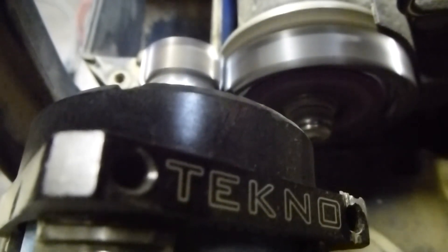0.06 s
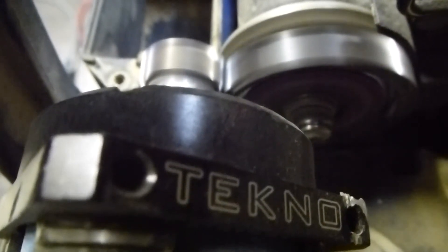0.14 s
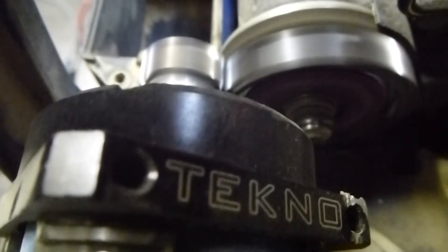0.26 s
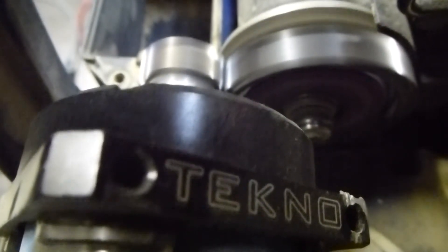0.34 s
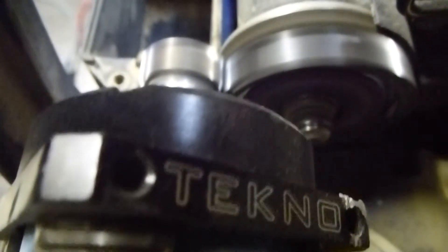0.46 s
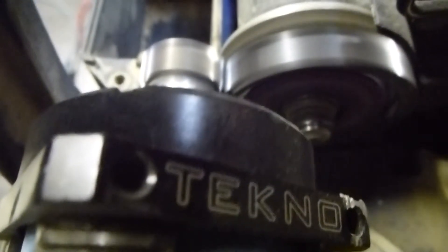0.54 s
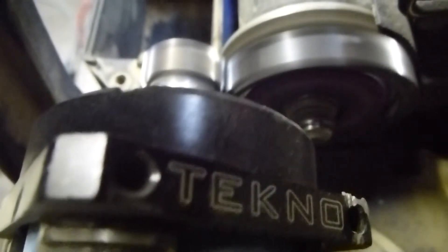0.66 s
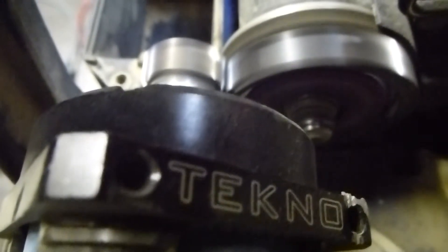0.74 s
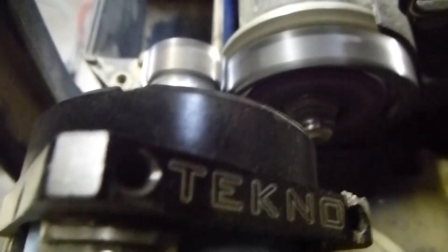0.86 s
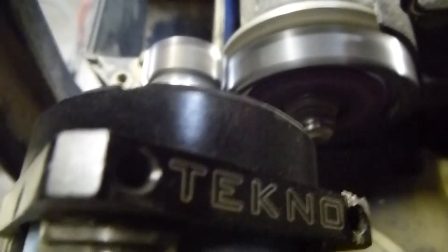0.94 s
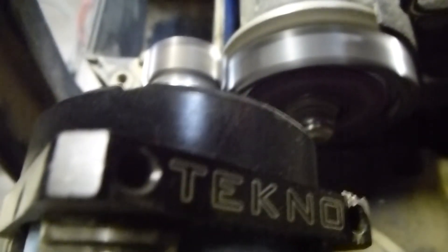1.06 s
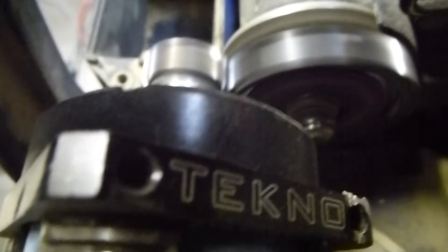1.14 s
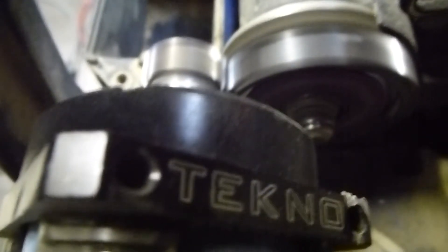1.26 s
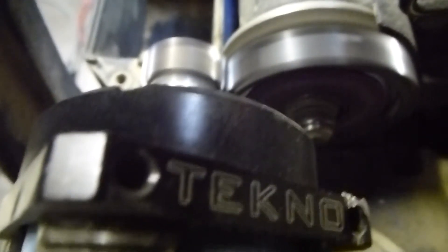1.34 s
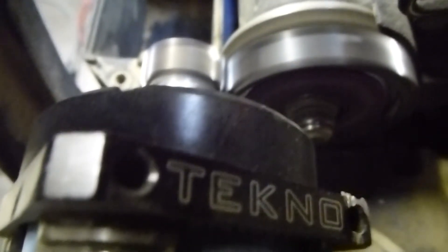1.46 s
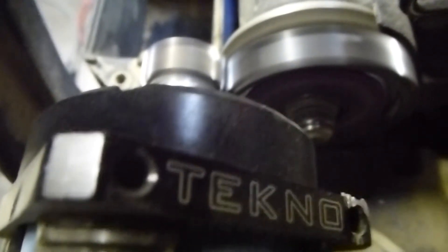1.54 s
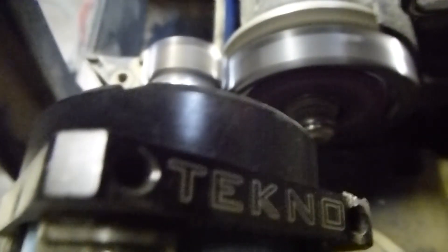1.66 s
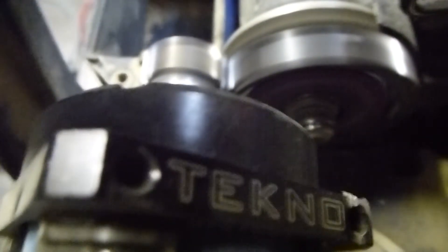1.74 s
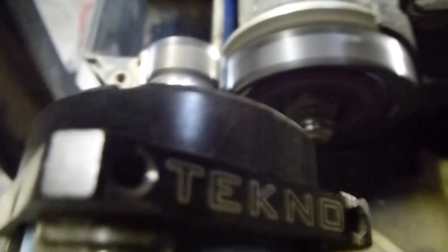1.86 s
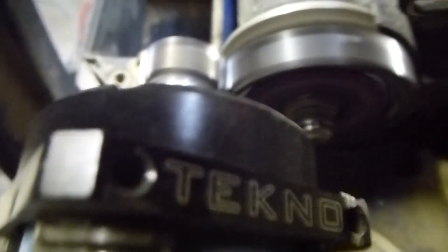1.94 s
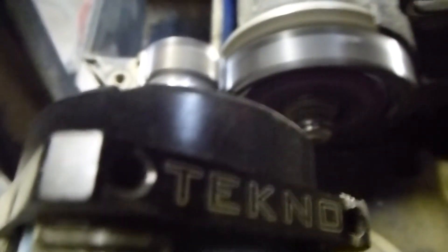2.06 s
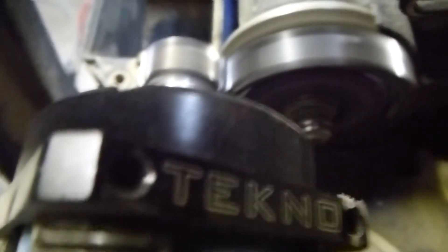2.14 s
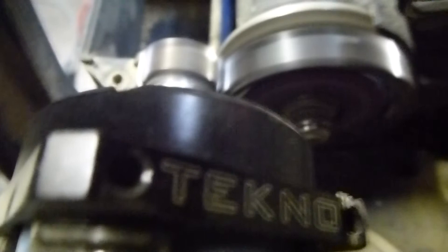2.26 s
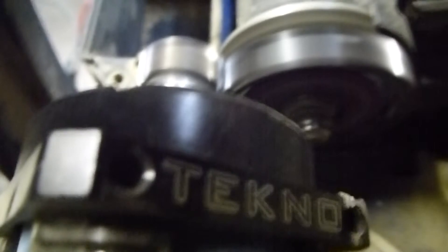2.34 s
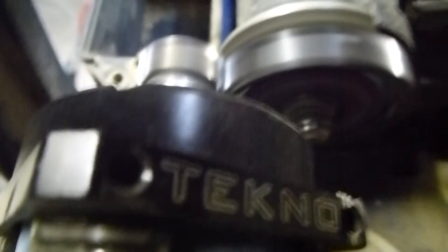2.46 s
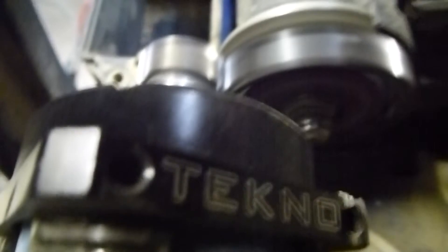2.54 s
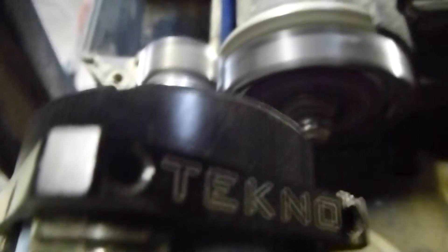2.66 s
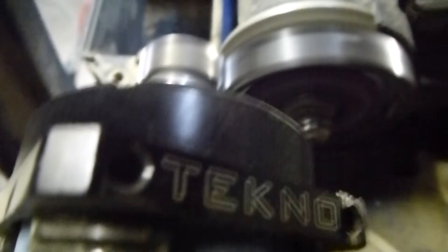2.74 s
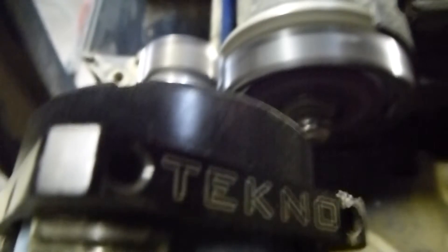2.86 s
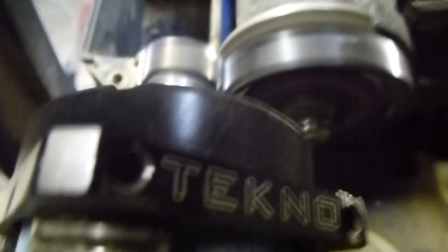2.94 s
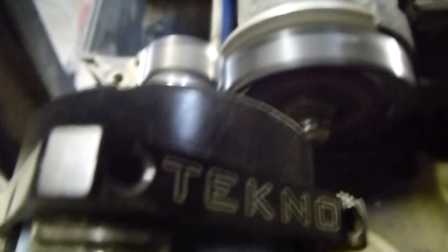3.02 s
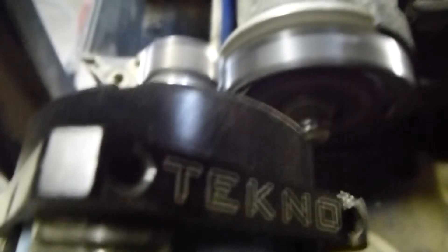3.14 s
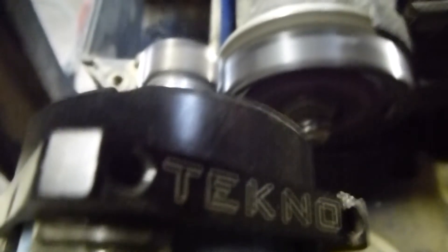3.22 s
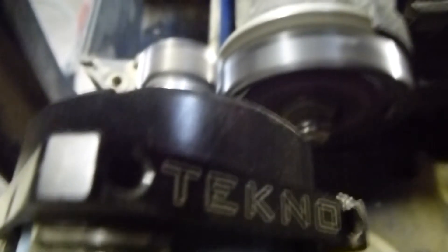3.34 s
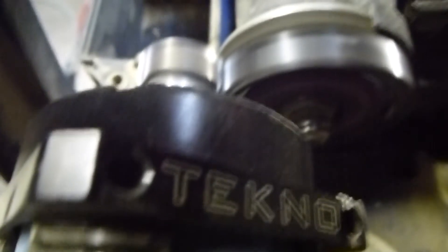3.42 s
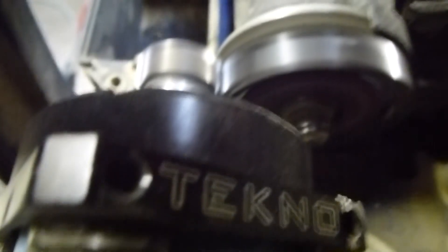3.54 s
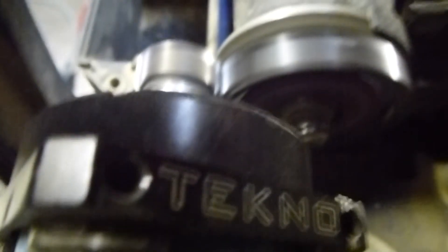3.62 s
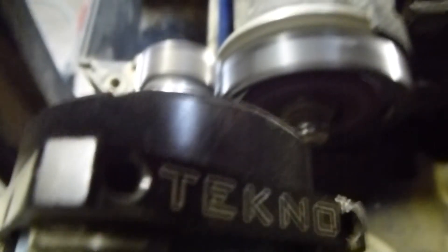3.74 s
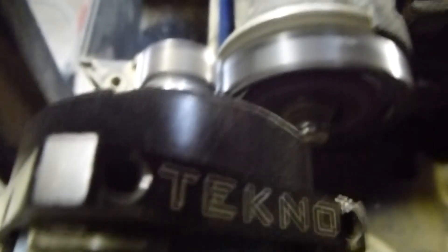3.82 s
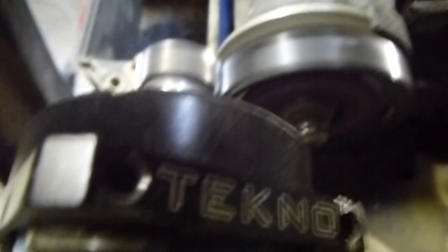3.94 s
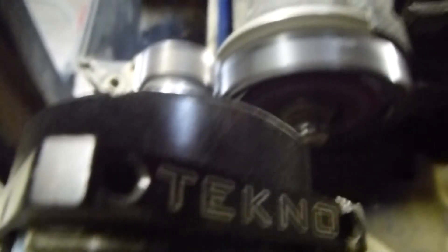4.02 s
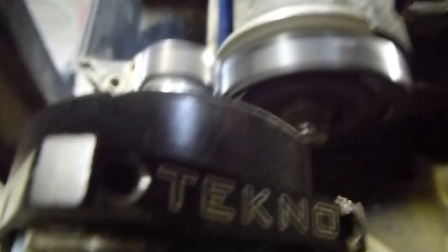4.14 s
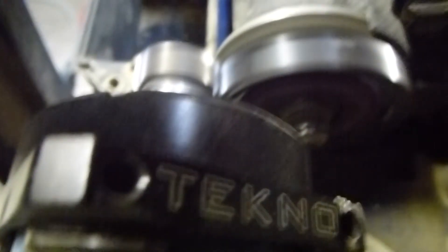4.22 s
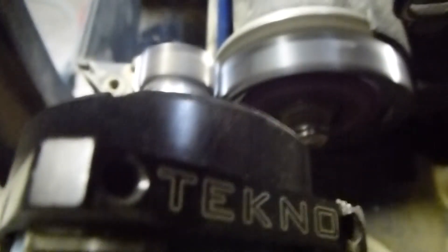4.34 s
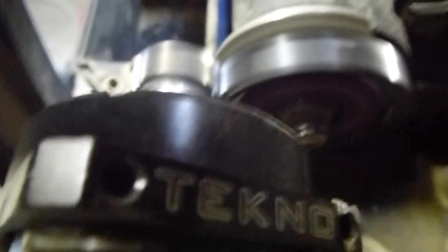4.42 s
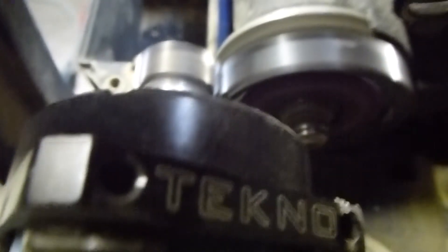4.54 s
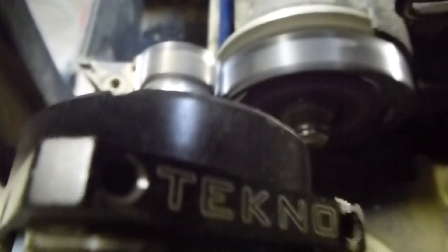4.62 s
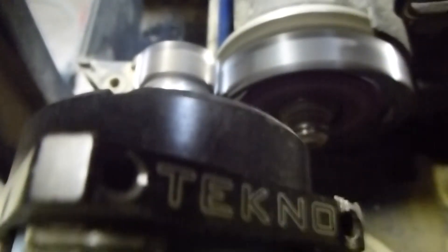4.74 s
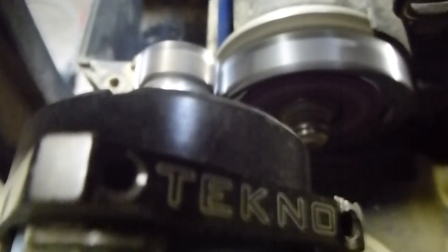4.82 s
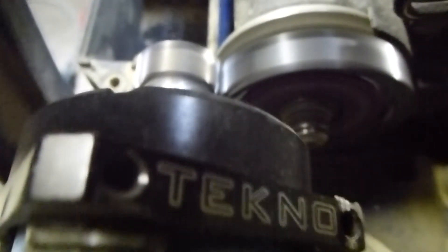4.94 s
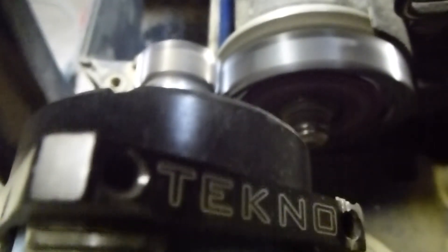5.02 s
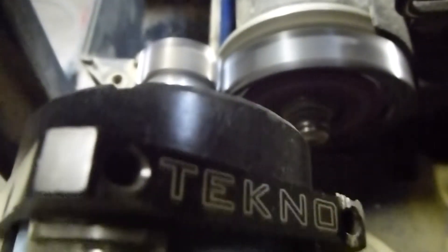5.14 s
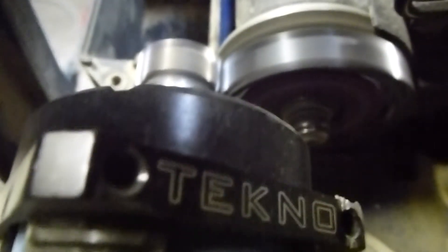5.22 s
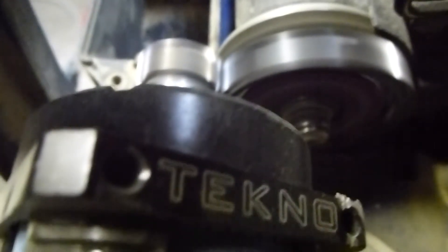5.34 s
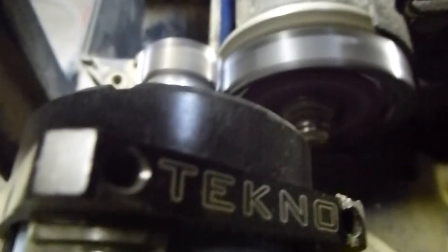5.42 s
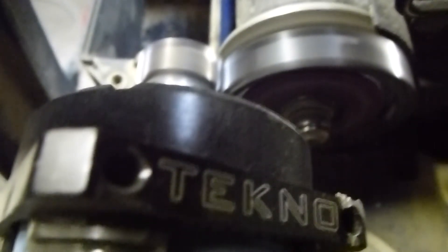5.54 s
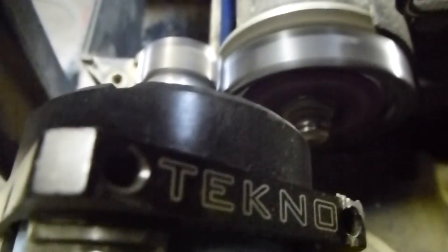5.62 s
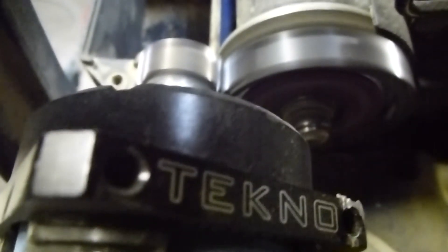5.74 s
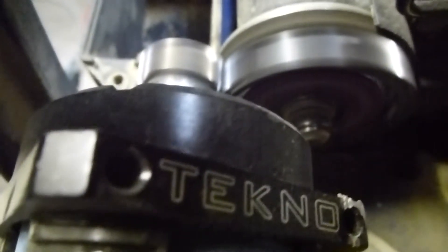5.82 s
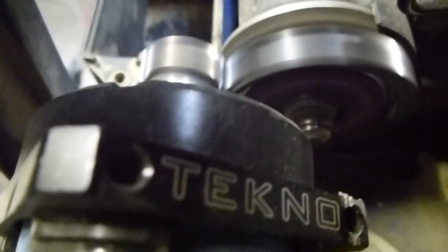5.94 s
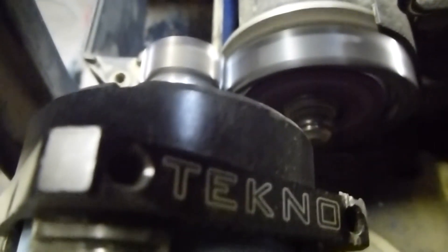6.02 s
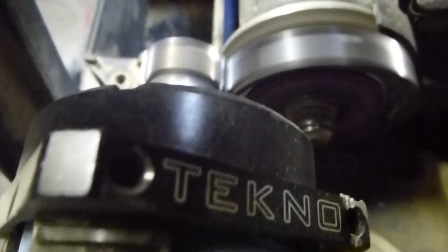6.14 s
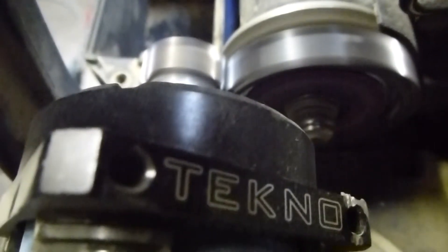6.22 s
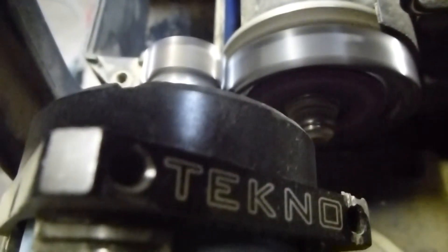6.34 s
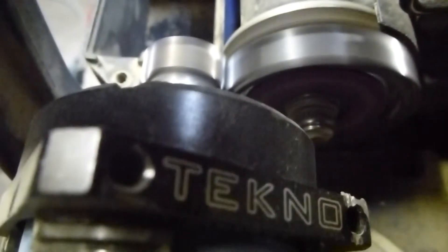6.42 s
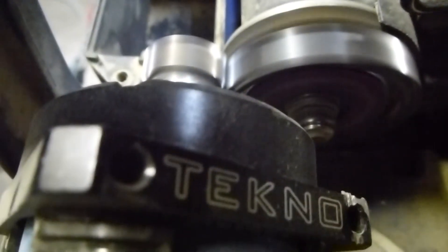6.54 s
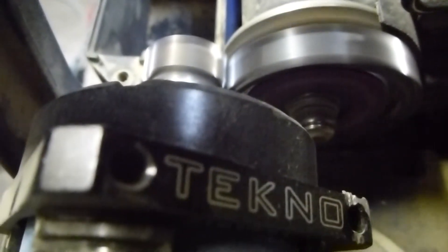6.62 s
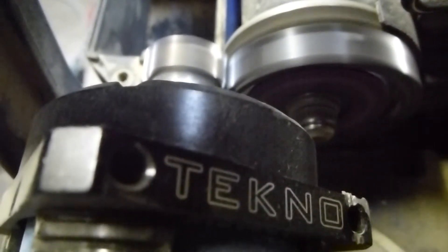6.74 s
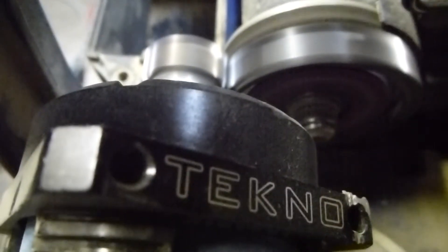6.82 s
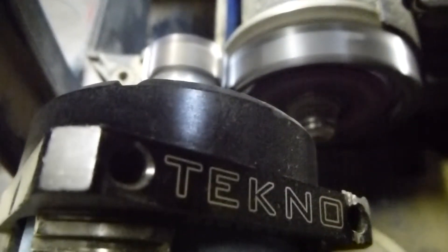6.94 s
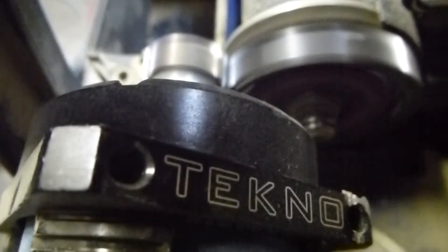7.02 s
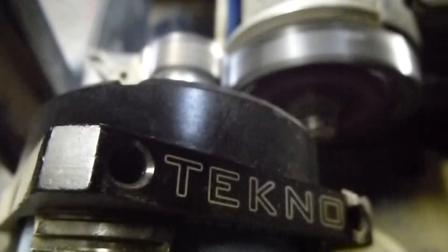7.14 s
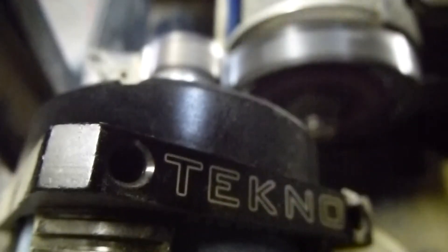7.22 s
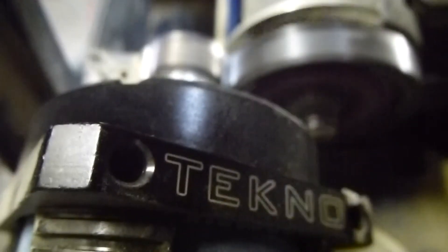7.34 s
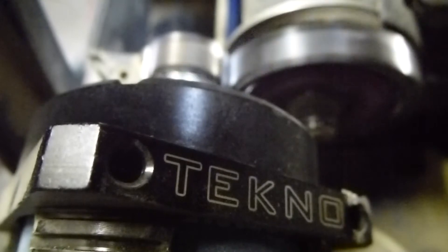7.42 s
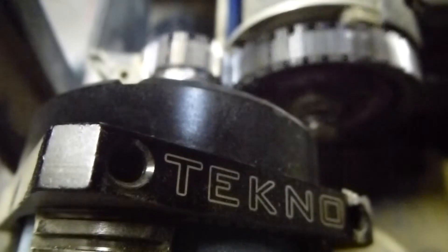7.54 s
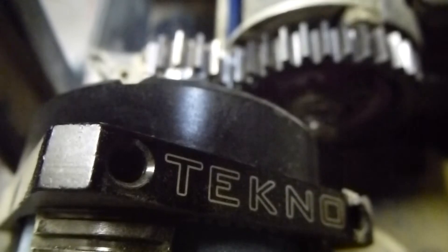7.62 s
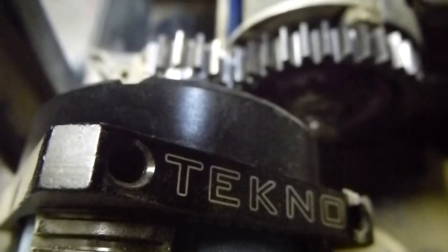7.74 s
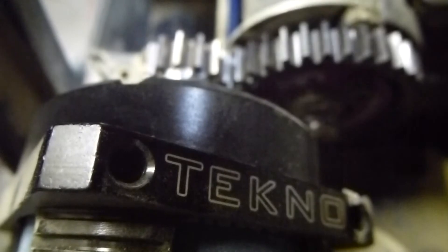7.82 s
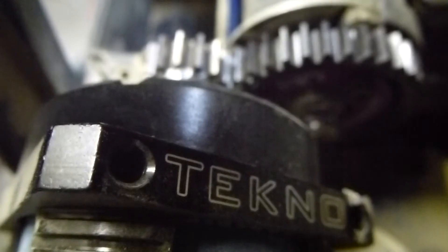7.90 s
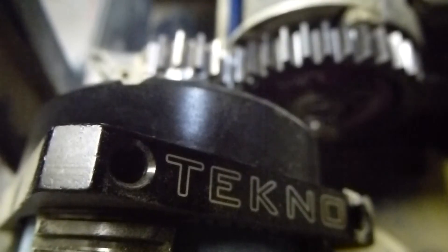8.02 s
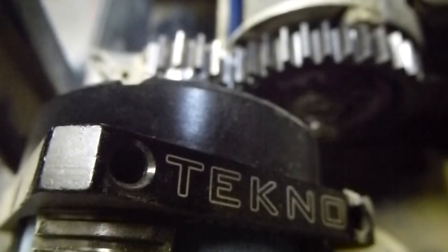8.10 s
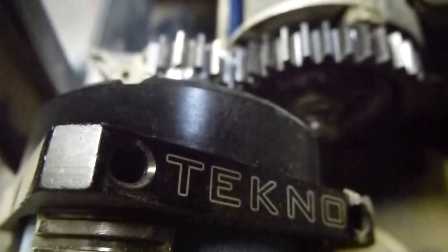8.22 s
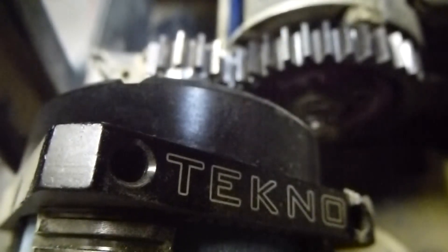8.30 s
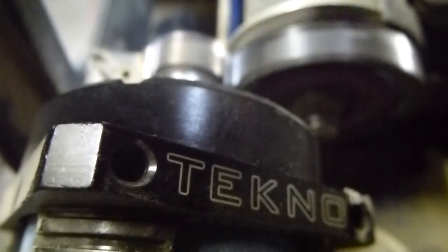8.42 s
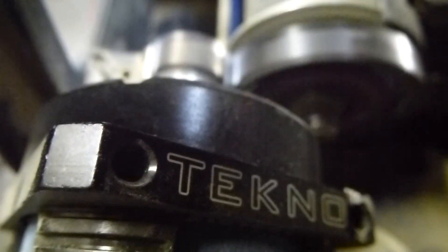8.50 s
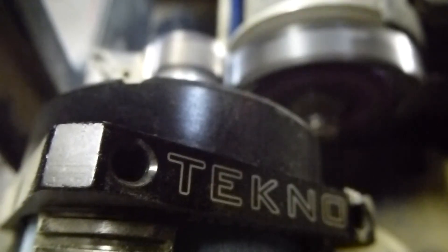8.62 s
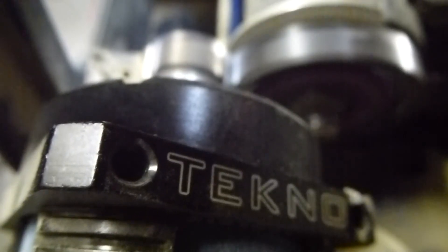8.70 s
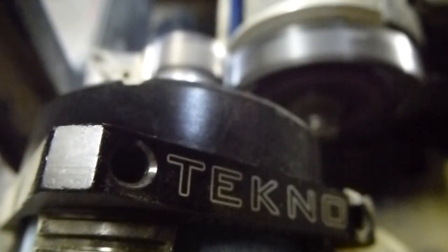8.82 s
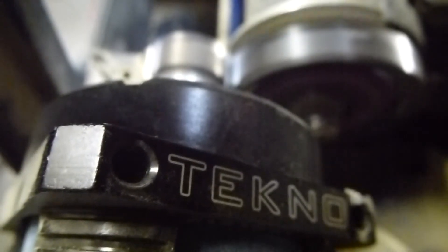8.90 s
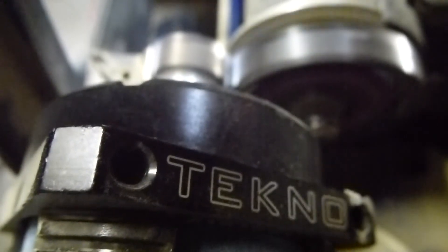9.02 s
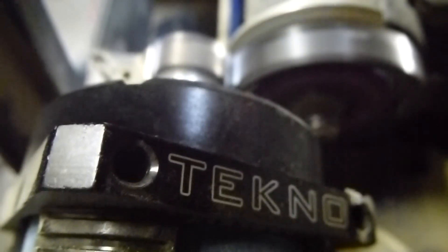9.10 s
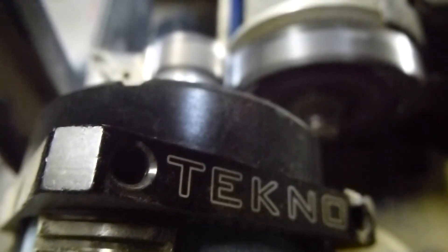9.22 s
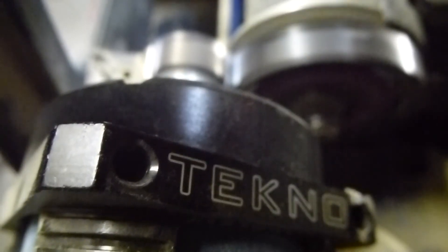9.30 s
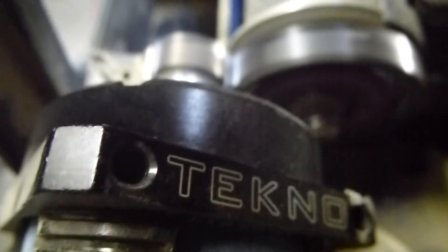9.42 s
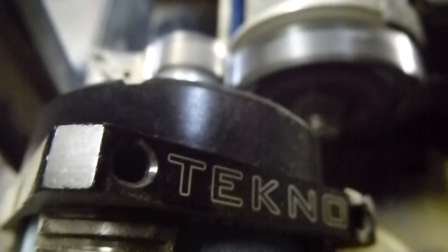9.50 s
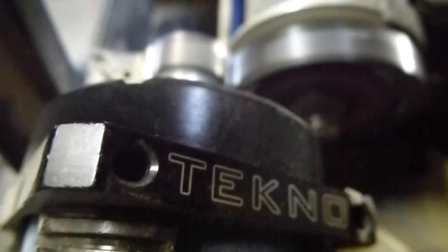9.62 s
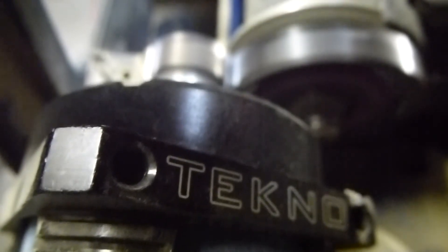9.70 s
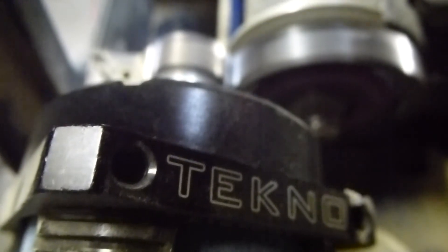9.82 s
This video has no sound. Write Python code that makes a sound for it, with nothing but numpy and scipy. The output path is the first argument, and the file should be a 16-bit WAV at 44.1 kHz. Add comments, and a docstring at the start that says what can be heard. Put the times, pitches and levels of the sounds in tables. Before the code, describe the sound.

A small electric motor with metal gears revs up to a harsh rattling whine, coasts down, clatters to a stop, then restarts.

```python
"""A small electric motor on a stand turns a 14-tooth pinion, a 38-tooth spur gear and a drive line.
It runs up, coasts to a halt and starts again: loose teeth rattle frame, case and steel gears as shaped
noise, and shafts and tooth mesh sound as sines locked to the speed. The gear sound dips near 1.9 and 5 s.
Slack teeth knock with ringing bursts, with two rasps, a dull knock and a buzz. A fan hums and hisses
throughout, heard alone at rest, where this background slowly changes in level."""
import sys
import numpy as np
from scipy.fft import rfft, irfft, next_fast_len
from scipy.io import wavfile
from scipy.ndimage import map_coordinates

SR = 44100
rng = np.random.default_rng(int(sys.argv[2]) if len(sys.argv) > 2 else 0)


def persist_wave(psi):
    """Save psi, clipped to +-1, as 16-bit WAV."""
    counts = np.round(np.clip(psi, -1, 1) * 32767).astype(np.int16)
    wavfile.write(sys.argv[1], SR, np.atleast_2d(counts).T)


N = 434817

PINION_TEETH, SPUR_TEETH = 14, 38
THROTTLE_CLOSE_S, THROTTLE_REOPEN_S, UNLOAD_S = 4.257, 8.345, 0.18
# coasting speed decays towards a point below zero (drag plus dry friction); friction eases at the end
DRAG_PER_S, FRICTION_HZ, EASE_HZ = .371, 241, 24
# changes once the load is off the teeth
COAST_FRAME_DB, COAST_HISS_DB, COAST_ROTOR_DB, COAST_SPUR_DB = 3, 0, 2, 4.5
COAST_ORDER_DB, COAST_SIDE_DB = 4, -6  # multiples 3 and 4 of motor speed; the others above 2
RING_HZ, RING_WIDTH_HZ, RING_DAMPED = 10750, 450, .42  # gear ring; share lost at its peak under load
BRIGHT_HZ, BRIGHT_WIDTH_HZ, BRIGHT_FLICKER_DB = 8500, 780, 1.5
SLOW_THROB_DB = 0.8  # hiss throb once a motor turn, at low speed
CRACK_T60_S = 0.013
BUMP_S, BUMP_DB, BUMP_HZ, BUMP_T60_S = .54, -20, 105, .05
BUZZ_HZ, BUZZ_DB, BUZZ_START_S, BUZZ_END_S = 385, -36, 8.62, 8.86
TOP_HZ = 15750

# Motor under open throttle: (time [s], speed [turns/s])
FIRST_RUN_SPEED = [(0, 149), (.3, 184), (.6, 213), (.75, 238), (1.35, 317), (1.65, 375), (1.8, 400),
                   (2.4, 485), (2.6, 508), (2.95, 525), (3.5, 525.5), (3.95, 550), (4.2, 556)]
SECOND_RUN_SPEED = [(8.345, 14), (8.39, 17), (8.402, 29), (8.425, 39), (8.445, 30), (8.46, 16), (8.475, 20),
                    (8.5, 36), (8.54, 40.5), (8.57, 48.5), (8.6, 51), (8.64, 57.5), (8.68, 61.5),
                    (8.74, 64), (8.84, 68), (8.875, 75), (8.925, 70.5), (8.95, 75), (8.97, 79.6),
                    (9.02, 80.5), (9.065, 86.8), (9.11, 87), (9.16, 92.5), (9.21, 93.5), (9.26, 97.5),
                    (9.3, 98.2), (9.335, 101.5), (9.4, 104), (9.53, 109), (9.67, 112.5), (9.86, 116.8)]
# Overall level of the gear sound as heard, with dips near 1.9 and 5 s: (time [s], level [dB])
GEAR_SOUND_LEVEL = [(0, -25), (1.3, -25.5), (1.62, -30), (1.82, -36.5), (2.05, -35.5), (2.4, -25.5),
                    (3.8, -25.5), (4.7, -28), (4.97, -37), (5.4, -37), (6.4, -37.5), (7.3, -38.5),
                    (7.39, -43.5), (7.46, -39), (7.585, -47), (7.61, -52), (7.7, -69), (8.345, -103),
                    (8.36, -34.5), (8.4, -29.5), (8.445, -28)  , (8.456, -30), (8.478, -32), (8.495, -32.5),
                    (8.6, -28), (8.78, -31), (8.9, -26), (9.86, -26.5)]
# Frame rumble over the gear sound level: (motor speed [turns/s], level [dB])
FRAME_BY_SPEED = [(10, 7.5), (18, 4), (35, -3), (60, -4), (100, -4.5), (170, -6.5), (300, -8.5), (520, -10)]
# Gear hiss over the gear sound level: (motor speed [turns/s], level [dB])
HISS_BY_SPEED = [(10, -7), (18, -9.5), (35, -5), (60, -1), (100, 0.5), (160, 1.5), (250, 1), (520, 0.5)]
# Rotor tone over the gear sound level: (motor speed [turns/s], level [dB])
ROTOR_BY_SPEED = [(30, -32), (60, -27), (95, -16.5), (115, -11), (135, -12), (175, -0.5), (225, 3.5),
                  (255, 3.5), (285, -2.5), (315, -6.5), (370, -8.5), (420, -5.5), (460, -7), (510, -13),
                  (555, -7)]
# Spur gear tone over the gear sound level: (spur speed [turns/s], level [dB])
SPUR_BY_SPEED = [(40, -40), (110, -24), (145, -16), (165, -10.5), (180, -6), (195, -4.5), (205, -1)]
# Mesh whine over the gear sound level: (tooth rate [Hz], level [dB])
WHINE_BY_RATE = [(190, 6), (260, 5), (420, -1), (540, -1), (650, -5), (740, -8), (840, -4), (890, -18),
                 (950, -24), (1000, -15), (1060, -14), (1110, -2), (1250, 1), (1400, 3), (1630, -4),
                 (2100, -15), (2600, -25), (3600, -28), (6000, -30), (7350, -25), (7800, -21)]
# Change of the whine off load: (tooth rate [Hz], change [dB])
COAST_WHINE = [(170, -30), (240, -8), (450, -11), (600, -12), (860, -20), (900, 2), (950, 14), (1000, 5),
               (1060, 3), (1110, -9), (1220, -6), (1330, -2), (1500, -4), (1700, -4), (2300, -16),
               (7000, -10)]
# Whine overtone, shaped by a case resonance: (overtone frequency [Hz], level over the gear sound [dB])
WHINE_OVERTONE = [(900, -26), (1050, -12), (1170, -1), (1300, 1), (1450, 6), (1650, -3), (1780, -24)]
# Weaker drive-line tones, loudest as they cross a resonance:
# (multiple of motor speed, level over the gear sound [dB], resonance [Hz], loss an octave away [dB])
SIDE_TONES = [(.175, -15, 92, 24), (.243, -25, 125, 10), (.307, -19, 170, 30), (.525, -16, 210, 14),
              (.632, -13, 240, 20), (.69, -12, 205, 40), (.737, -10, 205, 36), (.878, -11, 215, 30),
              (2, -20, 1040, 40), (2.266, -18, 680, 26), (4.53, -14, 2250, 30), (6.63, -9, 2380, 28),
              (3, -19, 1020, 30), (4, -19, 1120, 26), (6.63, -15, 760, 50), (13, -11, 1400, 40),
              (13.63, -8, 1300, 36), (14.37, -10, 1350, 40), (15, -10, 1400, 40)]
# Slowest shafts out of balance: (multiple of motor speed, [(frequency [Hz], level [dB rms])])
UNBALANCE = [(.061, [(15, -68), (21, -49), (26, -43), (29.5, -43), (32, -49), (34, -42)]),
             (.122, [(22, -63), (28, -54), (34, -44), (42, -46), (50, -52), (68, -50)])]
# Spectra of the parts the rattling teeth sound through: (frequency [Hz], density [dB per Hz])
FRAME_SPECTRUM = [(15, -31), (30, -9), (65, -13), (110, -13), (160, -5), (230, 3.5), (300, -5.5), (400, -7),
                  (520, -7.5), (680, -14.5), (900, -43)]
CASE_SPECTRUM = [(500, -18), (680, -13), (800, -12.5), (890, -10), (990, -6), (1150, -4.5), (1480, 3.5),
                 (1650, 0.5), (1830, -6.5), (2300, -1), (3300, -5), (3900, -3.5), (4700, -9.5), (6500, -87)]
GEAR_SPECTRUM = [(4000, -90), (4900, 1.5), (5700, 2.5), (6600, 1), (7500, 3), (8300, 8.5), (9300, 1.5),
                 (10000, 0.5), (10800, 6.5), (11700, -3.5), (12800, 0.5), (13500, -2.5), (16000, -3.5),
                 (19000, -35)]
# Spectra at low speed and weak hiss, parts ringing at their own pitches: (frequency [Hz], density [dB per Hz])
SLOW_CASE_SPECTRUM = [(380, -18), (500, -8.5), (680, -15.5), (820, -1), (890, -8.5), (990, -5.5),
                      (1180, -1), (1450, 5.5), (1650, 1), (1830, -5), (2300, -6.5), (3500, -18),
                      (4800, -22), (6500, -62)]
SLOW_GEAR_SPECTRUM = [(4000, -38), (5000, -17.5), (5900, -8.5), (6800, -12), (7800, -8), (8300, -1),
                      (9000, -4), (10100, -10.5), (10750, 2), (11500, -12.5), (12800, -2.5), (13400, -16),
                      (16000, -17), (19000, -40)]
# Change of the case rattle while coasting fast: (frequency [Hz], change [dB])
COAST_CASE = [(450, 9), (650, -2.5), (1200, -2.5), (1400, -1.5), (1800, -1), (2250, 2.5), (3500, -2)]
# Change of the gear hiss at full speed: (frequency [Hz], change [dB])
FULL_SPEED_HISS = [(6600, -0.5), (7500, 3.5), (8000, 0.5), (8500, -3), (9300, 1)]
# Single teeth knocking as the gears stop and start:
# (time [s], relative crack level [dB], thump over that level [dB])
CLACKS = [(7.2143, -35, 6), (7.25, -30, 0), (7.286, -31.5, -6), (7.32, -39, -1), (7.382, -32, -14),
          (7.387, -31, 3), (7.404, -35, 2), (7.4143, -34, 6), (7.42, -31, 0), (7.4348, -31, -4),
          (7.454, -32, 11), (7.461, -28, -10), (7.469, -28, -2), (7.477, -30.5, 10), (7.4853, -27, 4),
          (7.497, -25, 0), (7.509, -27, 7), (7.521, -29, 5), (7.531, -27, -5), (7.545, -34.5, 11),
          (7.5612, -35, -8), (7.564, -28, -5), (7.581, -23.5, 0), (7.6676, -40.5, 10), (8.3553, -30, 7),
          (8.3616, -20.5, -8), (8.3736, -27, 5), (8.381, -23, -8), (8.388, -29, 8), (8.4437, -24, 2),
          (8.449, -26, 7), (8.453, -44, 27.5), (8.467, -41.5, 31)]
# Gear response to a knock: (frequency [Hz], gain [dB])
CRACK_RESPONSE = [(500, -24), (900, -5), (1480, 6), (1900, -9), (3000, -4.5), (4700, -5.5), (6000, -4.5),
                  (8300, -0.5), (9800, -3), (10800, 2), (12800, -4), (15500, -12), (19000, -40)]
# Frame modes rung by a knock: (frequency [Hz], relative level [dB], decay time T60 [s])
THUMP_MODES = [(234, -2, 0.077), (406, -9.5, 0.04), (800, -14, 0.048)]
# Rasps as the throttle closes: (start of swell [s], level at its peak [dB], 1/e width [s])
SCRAPES = [(4.359, -24, 0.025), (4.477, -24.5, 0.032)]
# Spectrum of the rasps: (frequency [Hz], relative density [dB])
SCRAPE_SPECTRUM = [(1200, -18), (2100, -5), (3700, 1), (4300, -7), (6500, -32)]
# Background hiss as heard, its level rising while the machine rests: (time [s], level [dB])
BACKGROUND_LEVEL = [(0, -44), (7.6, -48.5), (8.35, -44), (9.86, -44)]
# Fan hiss spectrum: (frequency [Hz], relative density [dB])
FAN_SPECTRUM = [(15, -30), (40, 0), (120, -10), (290, -15), (520, -6), (1900, -9), (3100, 2), (4500, -5.5),
                (9000, -20.5), (11500, -19), (16000, -30)]
# Hum lines, before the background level is applied: (frequency [Hz], relative level [dB])
HUM_LINES = [(197.6, -54), (987.9, -62), (2963.5, -62.5), (3952, -59), (4939.5, -61)]
# Likeness of the two channels: (frequency [Hz], coherence [0 to 1])
LIKENESS = [(40, .7), (100, .92), (200, .99), (400, .95), (550, .72), (1000, .77), (1500, .96), (3000, .9),
            (7000, .76), (15000, .62)]
# Left channel gain: (frequency [Hz], gain [dB])
LEFT_GAIN = [(40, -27), (100, -16.5), (200, -10), (300, -6), (500, -5), (750, 1.5), (1100, 1), (1300, -2),
             (2000, -.3), (5000, -1.5), (7000, -3), (10000, -6.5), (15500, -11.5)]
# Left channel phase: (frequency [Hz], phase [rad])
LEFT_PHASE = [(40, -1.5), (100, -1.25), (200, -1.42), (400, -2.05), (700, -3), (1000, -3.25), (1500, -3.65),
              (2000, -3.5), (5000, -3.8), (13000, -4.5)]


def amp(db):
    """Decibel law: amplitude ratio of a level."""
    return 10 ** (np.asarray(db) / 20)


def unit(x):
    """Power normalization: scales a signal to rms 1."""
    return x / np.sqrt(np.mean(x ** 2, axis=-1, keepdims=True) + 1e-20)


def along(points, hz):
    """Logarithmic pitch scale: interpolates (frequency, value) points."""
    f, v = np.transpose(points)
    return np.interp(np.log(hz + 1), np.log(f + 1), v)


def curve(rows):
    """Linear interpolation in time: one value per sample."""
    times, values = np.transpose(rows)
    return np.interp(np.arange(N) / SR, times, values)


def wobble(rate):
    """Band-limited fluctuation: a smooth random curve, rate knots a second."""
    knots = rng.standard_normal(int(N * rate / SR) + 4)
    return map_coordinates(knots, [np.arange(N) * rate / SR])


def filtered(x, response):
    """Linear filtering: multiplies the spectrum by a complex response."""
    m = next_fast_len(N + SR // 2)
    return irfft(rfft(x, m) * response(np.fft.rfftfreq(m, 1 / SR)), m)[..., :N]


def bell(x, center_hz, width_hz):
    """Resonance band: the Gaussian band of x around a center."""
    return filtered(x, lambda hz: np.exp(-((hz - center_hz) / width_hz) ** 2))


def reshaping(x, change):
    """Spectral change: what must be added to x to alter its bands by the table's dB."""
    return filtered(x, lambda hz: amp(along(change, hz)) - 1)


def rattle(spectrum, swell_db):
    """Modulated noise: two independent noises share one swelling, then a spectrum, each at rms 1."""
    noise = amp(swell_db) * rng.standard_normal((2, N))
    return unit(filtered(noise, lambda hz: amp(along(spectrum, hz))))


def tone(turns, waver_db, blur):
    """Phase modulation: a sine following a count of turns, nominal rms 1, unsteady in level and phase."""
    level = np.sqrt(2) * amp(waver_db * wobble(22))
    return level * np.sin(2 * np.pi * turns + blur * wobble(40))


def drive():
    """Gear contact: rattling teeth excite frame, case and gears as noise, the shafts as tones."""
    speed, off_load = motor_speed(), coasting()
    frame_db, gear_db, hiss_db, rotor_db, spur_db, mesh_db = levels(speed)
    turns = np.cumsum(speed) / SR
    teeth, spur = turns * PINION_TEETH, turns * PINION_TEETH / SPUR_TEETH
    # power share of the full-spectrum rattle rises with speed and with the hiss level
    full_share = 1 / (1 + (190 / speed) ** 3 * amp(-1.2 * hiss_db - 44.0))
    # every tooth has its own strike strength, and the level sags until the next
    strike = np.clip(rng.standard_normal(int(teeth[-1]) + 1), -3, 2.6)[teeth.astype(int)]
    sag = teeth % 1
    # the spur gear runs out of true: the mesh tightens once and three times a turn
    runout = np.sin(2 * np.pi * spur) + 0.73 * np.sin(2 * np.pi * 3 * spur)
    runout += .5 * np.sin(2 * np.pi * turns)
    chatter = 2.0 * wobble(9) + 2.0 * wobble(45) + 2.0 * wobble(170) + 1.9 * wobble(80)

    gear_swell = 2.34 * strike - 1.4 * sag + 1.34 * runout + 0.26 * chatter
    gear_swell += SLOW_THROB_DB * np.sin(2 * np.pi * turns) / (1 + (speed / 130) ** 4)
    case_swell = 1.6 * strike - 3.1 * sag + .8 * runout + .2 * chatter
    case_swell += 1.1 * wobble(110) + .9 * wobble(8)
    noise = gear_hiss(speed, off_load, full_share, gear_swell, hiss_db)
    noise += amp(gear_db) * case_rattle(speed, off_load, full_share, case_swell)
    noise += amp(frame_db) * rattle(FRAME_SPECTRUM, 0.4 * chatter + 0.39 * wobble(30))

    tones = amp(rotor_db) * tone(turns, waver_db=1.5, blur=0.27)
    tones += amp(spur_db) * tone(spur, waver_db=-0.1, blur=0.25)
    tones += mesh_whine(speed, off_load, turns, gear_db, mesh_db)
    return noise + tones + shaft_tones(speed, off_load, turns, gear_db)


def gear_hiss(speed, off_load, full_share, swell_db, hiss_db):
    """Resonant radiation: steel gears filter tooth noise; load damps a ring, weak hiss is duller."""
    hiss = np.sqrt(full_share) * rattle(GEAR_SPECTRUM, swell_db)
    hiss += np.sqrt(1 - full_share) * rattle(SLOW_GEAR_SPECTRUM, 1.02 * swell_db)
    hiss -= RING_DAMPED * (1 - off_load) * bell(hiss, RING_HZ, RING_WIDTH_HZ)
    hiss += np.clip((speed - 380) / 120, 0, 1) * reshaping(hiss, FULL_SPEED_HISS)
    # the brightest ring flickers on its own
    flicker = amp(BRIGHT_FLICKER_DB * wobble(90)) - 1
    hiss += flicker * bell(hiss, BRIGHT_HZ, BRIGHT_WIDTH_HZ)
    # the top octave falls faster than the rest
    top = filtered(hiss, lambda hz: 1 / (1 + (13500 / (hz + 1)) ** 8))
    return amp(hiss_db) * (hiss - top + top * amp(.8 * hiss_db + 19))


def case_rattle(speed, off_load, full_share, swell_db):
    """Forced vibration: the gear case filters tooth noise, with another balance when coasting fast."""
    case = np.sqrt(full_share) * rattle(CASE_SPECTRUM, swell_db)
    case += np.sqrt(1 - full_share) * rattle(SLOW_CASE_SPECTRUM, 1.3 * swell_db)
    fast_coast = off_load * np.clip((speed - 130) / 100, 0, 1)
    return case + fast_coast * reshaping(case, COAST_CASE)


def mesh_whine(speed, off_load, turns, gear_db, mesh_db):
    """Amplitude modulation: pinion wobble once a turn puts sidebands on the tooth rate and its octave."""
    teeth = turns * PINION_TEETH
    wobble_db = 3.5 * np.sin(2 * np.pi * turns)
    whine = amp(mesh_db + wobble_db) * tone(teeth, waver_db=1.4, blur=.9 - .4 * off_load)
    overtone_db = along(WHINE_OVERTONE, 2 * PINION_TEETH * speed) - 11 * off_load
    return whine + amp(wobble_db + gear_db + overtone_db) * tone(2 * teeth, waver_db=2.5, blur=.9)


def shaft_tones(speed, off_load, turns, gear_db):
    """Order excitation: tones at multiples of motor speed swell at resonances; unbalance shakes the stand."""
    tones = np.zeros(N)
    for multiple, db, peak_hz, slope_db in SIDE_TONES:
        loss_db = slope_db * abs(np.log2(multiple * speed / peak_hz))
        coast_db = COAST_ORDER_DB if multiple in (3, 4) else COAST_SIDE_DB * (multiple > 2)
        level_db = gear_db + db - loss_db + coast_db * off_load
        tones += amp(level_db) * tone(multiple * turns, waver_db=1.5, blur=min(.2 + .07 * multiple, .8))
    for multiple, level in UNBALANCE:
        tones += amp(along(level, multiple * speed)) * tone(multiple * turns, waver_db=1.2, blur=.15)
    return tones


def motor_speed():
    """Rotational dynamics: two throttled runs with a coast against drag and dry friction between."""
    t = np.arange(N) / SR
    first, second = curve(FIRST_RUN_SPEED), curve(SECOND_RUN_SPEED)
    decay = np.exp(-DRAG_PER_S * (t - THROTTLE_CLOSE_S))
    free = (first[-1] + FRICTION_HZ) * decay - FRICTION_HZ
    coast = EASE_HZ * np.logaddexp(0, free / EASE_HZ)
    return np.where(t < THROTTLE_CLOSE_S, first, np.where(t < THROTTLE_REOPEN_S, coast, second))


def coasting():
    """Load release: rises to 1 as the load leaves the teeth, and is 0 under throttle."""
    t = np.arange(N) / SR
    return np.clip((t - THROTTLE_CLOSE_S) / UNLOAD_S, 0, 1) * (t < THROTTLE_REOPEN_S)


def levels(speed):
    """Level addition: dB of frame, case, gear hiss, rotor, spur and whine follow gear level and speed."""
    gear_db, off_load = curve(GEAR_SOUND_LEVEL), coasting()
    tooth_hz = speed * PINION_TEETH
    return (gear_db + along(FRAME_BY_SPEED, speed) + COAST_FRAME_DB * off_load,
            gear_db,
            gear_db + along(HISS_BY_SPEED, speed) + COAST_HISS_DB * off_load,
            gear_db + along(ROTOR_BY_SPEED, speed) + COAST_ROTOR_DB * off_load,
            gear_db + along(SPUR_BY_SPEED, tooth_hz / SPUR_TEETH) + COAST_SPUR_DB * off_load,
            gear_db + along(WHINE_BY_RATE, tooth_hz) + along(COAST_WHINE, tooth_hz) * off_load)


def clacks():
    """Impact excitation: slack teeth meet, the gears ring as decaying noise and the frame in damped modes."""
    cracks, thumps = np.zeros((2, N + SR)), np.zeros(N + SR)
    t = np.arange(SR // 10) / SR
    for s, db, thump_db in CLACKS:
        start = round(s * SR)
        burst = amp(db + 5.0 - 60 * t / CRACK_T60_S) * rng.standard_normal((2, len(t)))
        cracks[:, start:start + len(t)] += burst
        for hz, mode_db, t60 in THUMP_MODES:
            decay = amp(db + thump_db + mode_db - 60 * t / t60)
            thumps[start:start + len(t)] += decay * np.sin(2 * np.pi * hz * t)
    return filtered(cracks[:, :N], lambda hz: amp(along(CRACK_RESPONSE, hz))) + thumps[:N]


def scrapes():
    """Rough friction: rasps are short Gaussian swells of middle-band noise."""
    t = np.arange(N) / SR
    swell = sum(amp(db) * np.exp(-((t - s - length / 2) / length) ** 2 * 4) for s, db, length in SCRAPES)
    return swell * rattle(SCRAPE_SPECTRUM, 1.5 * wobble(300))


def bump():
    """Damped oscillation: one dull knock on the stand is a decaying low sine."""
    t = np.clip(np.arange(N) / SR - BUMP_S, 0, None)
    return amp(BUMP_DB - 60 * t / BUMP_T60_S) * np.sin(2 * np.pi * BUMP_HZ * t)


def buzz():
    """Natural frequency: a part buzzes at its own fixed pitch early in the second run."""
    t = np.arange(N) / SR
    swell = np.clip(np.minimum(t - BUZZ_START_S, BUZZ_END_S - t) / 0.01, 0, 1)
    return amp(BUZZ_DB) * swell * tone(BUZZ_HZ * t, waver_db=2.5, blur=.5)


def fan():
    """Broadband noise and line spectra: fan hiss and electronic hum share one slow background level."""
    t = np.arange(N) / SR
    level_db = curve(BACKGROUND_LEVEL)
    hum = sum(np.sqrt(2) * amp(db + 0.19 * wobble(12)) * np.sin(2 * np.pi * hz * t) for hz, db in HUM_LINES)
    return amp(level_db) * rattle(FAN_SPECTRUM, .5 * wobble(4.2)) + amp(level_db + 49.5) * hum


def scene():
    """Partial coherence: both channels hear the same machine, the left with a share of its own."""
    near, other = drive() + clacks() + scrapes() + bump() + buzz() + fan()
    alike = lambda hz: np.clip(along(LIKENESS, hz), 0, 1)
    own = lambda hz: np.sqrt(1 - alike(hz) ** 2) * np.exp(1j * hz / 37)
    left = filtered(near, alike) + filtered(other, own)
    return np.array([left, near])


def record(dry):
    """Linear transfer: the left is turned in phase and loses bass and treble; both are band-limited."""
    left = lambda hz: amp(along(LEFT_GAIN, hz)) * np.exp(1j * along(LEFT_PHASE, hz))
    return filtered(dry, lambda hz: np.array([left(hz), np.ones_like(hz)]) * (hz < TOP_HZ))


dry = scene()
out = record(dry)
persist_wave(out)
```